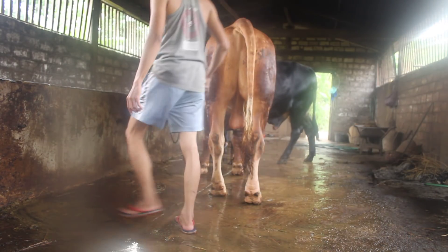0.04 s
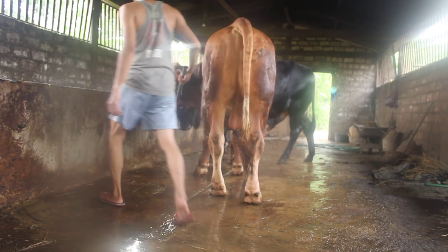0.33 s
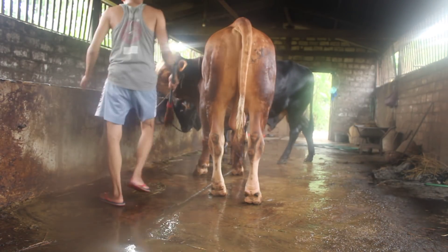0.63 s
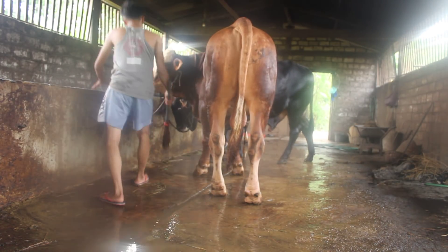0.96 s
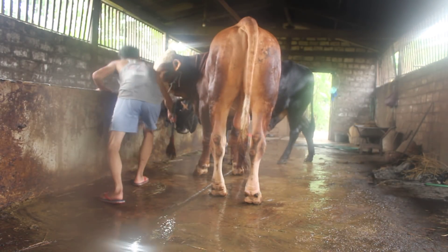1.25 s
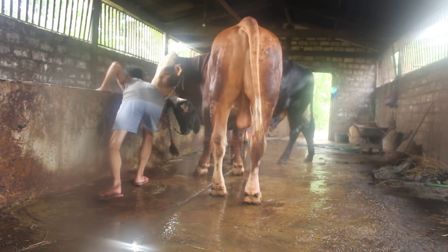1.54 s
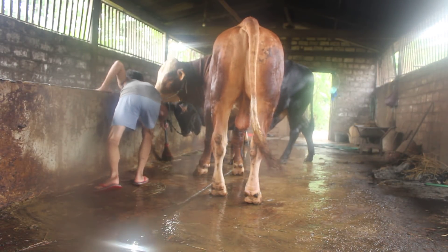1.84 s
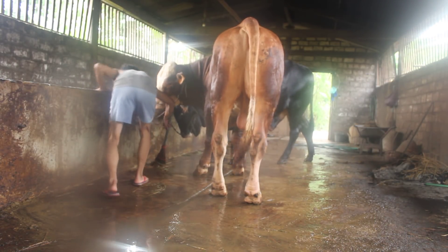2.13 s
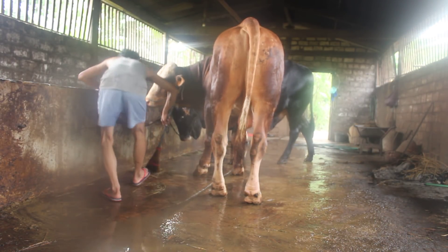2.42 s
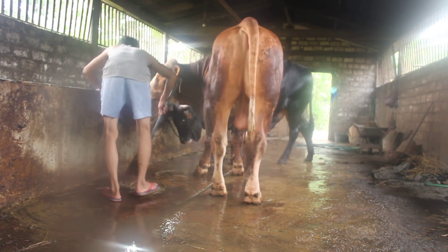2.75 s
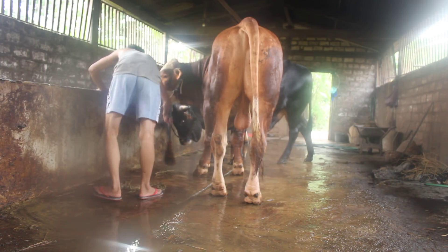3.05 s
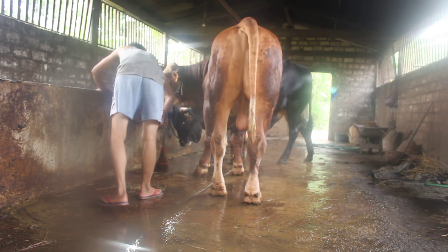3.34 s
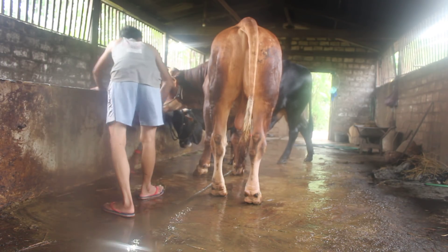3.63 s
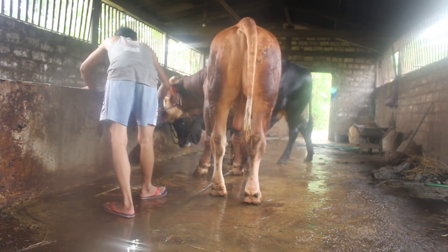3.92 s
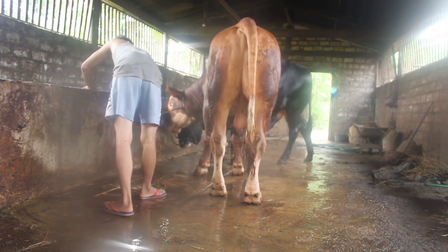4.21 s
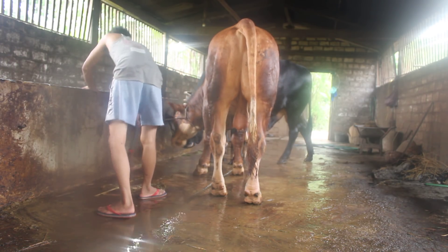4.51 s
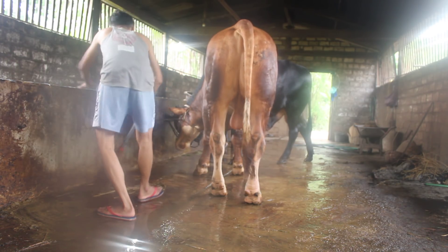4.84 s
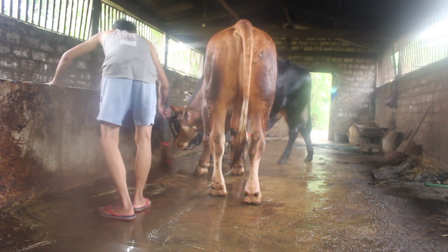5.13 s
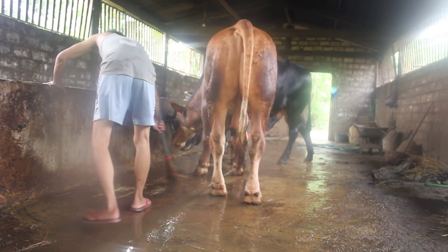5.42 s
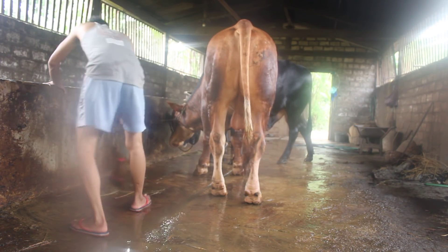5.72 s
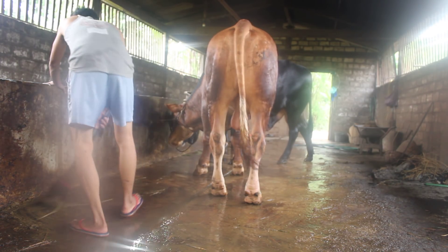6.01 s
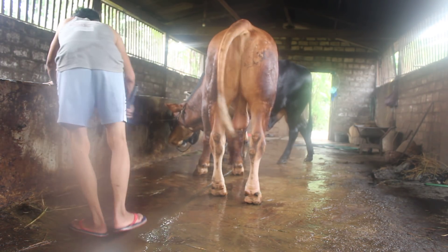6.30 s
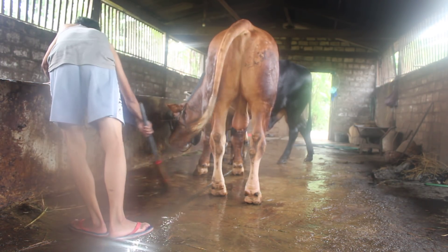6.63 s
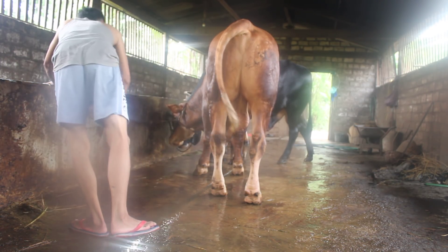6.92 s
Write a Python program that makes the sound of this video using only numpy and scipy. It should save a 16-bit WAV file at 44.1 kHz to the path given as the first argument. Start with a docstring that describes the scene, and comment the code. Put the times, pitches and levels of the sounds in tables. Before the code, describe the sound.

Wet sandal steps and one bird squeak, then five scratchy, splashy broom sweeps over concrete, with distant machines droning.

```python
"""A stiff twig broom pushes water over the concrete floor of a brick cattle shed in five long strokes.
Its twigs catch on the grit, fling spray and shove the water along. Between strokes, wet sandals slap
and squelch, the twigs touch down and drops tick. A bird squeaks once under the roof.
The shed echoes briefly, and behind it all are outdoor air and far machines droning. The sound is mono."""
import sys
import numpy as np
from scipy import signal
from scipy.fft import rfft, irfft, next_fast_len
from scipy.io import wavfile
from scipy.ndimage import map_coordinates

SR = 44100
rng = np.random.default_rng(int(sys.argv[2]) if len(sys.argv) > 2 else 0)


def put_to_file(sound):
    """Save the sound as 16-bit audio at rate SR, in the file named by the first command-line argument."""
    columns = np.atleast_2d(sound).T  # one column per channel
    safe = np.clip(columns, -1, 1)
    whole_steps = np.round(safe * 32767)
    wavfile.write(sys.argv[1], SR, whole_steps.astype(np.int16))


N = 311346
T = np.arange(N) / SR  # the time of each sample in seconds

# The strokes: the twigs touch, bite, are pushed hardest, ease off and lift.
# Each row: start in seconds; attack, push, ease and release lengths in seconds; scrape level in dB at the
# bite, peak and lift; starting spray in dB above the scrape; relative peak level of the water in dB;
# ring pitch in Hz (lower when the bundle is pressed flat).
BROOM_STROKES = [(1.85, 0.45, .25, .135, .08, -27.5, -18.5, -21, -2, -34.5, 2900),
                 (3.2, .17, 0.27, 0.081, 0.079, -24, -18, -26, -0.5, -32, 3017),
                 (4.31, 0.12, .18, .23, 0.085, -23, -19, -26, -2.5, -33.5, 2947),
                 (5.39, 0.15, 0.41, .14, .1, -24.5, -18.5, -25.5, -3, -34, 3340),
                 (6.775, 0.053, .28, 0.097, 0.074, -19.5, -18, -25, -3, -35, 2650)]
# The tone of twigs and spray. Each row: frequency in Hz, relative strength in dB.
TWIG_TONE = [(400, -45), (1000, -15), (1450, -8.5), (1850, -3), (2300, -2), (2800, 0.5), (3800, -0.8),
             (5000, -1.4), (7300, -4), (10500, -9), (13000, -13.5), (15500, -16)]
# The tone of sloshing water. Each row: frequency in Hz, relative strength in dB.
WATER_TONE = [(150, -21), (400, -13), (700, -9), (1100, -6), (1600, -6.5), (2300, -5), (5000, -36)]


def broom(twigs_per_s=10000, drops_per_s=4500, split_hz=7000, water_db=-2, ring_db=-13, ring_width_hz=700):
    """Hundreds of twig tips catch on the grit, ring, fling fine spray and shove a film of water."""
    touch_db = -40.5  # the scrape as the twigs first meet and last leave the floor
    spray_fade_db = -3  # the twigs have flung off their water by the end of a stroke
    scrape, spray, wash, tone_hz = np.zeros((4, N))
    for stroke in BROOM_STROKES:
        times = np.cumsum(stroke[:5])
        bite_db, peak_db, lift_db, spray_db, wash_db, ring_hz = stroke[5:]
        effort = list(zip(times, [touch_db, bite_db, peak_db, lift_db, touch_db]))
        level_db, on_floor = curves(effort)[0], gate(effort)
        progress = np.clip((T - times[0]) / (times[-1] - times[0]), 0, 1)
        scrape += on_floor * amp(level_db)
        spray += on_floor * amp(level_db + spray_db + spray_fade_db * progress ** 2)
        wash += on_floor * amp(wash_db + 0.63 * (level_db - peak_db))  # swells less than the scrape
        tone_hz[on_floor > 0] = ring_hz
    low_share = lambda hz: 1 / (1 + (hz / split_hz) ** 8)  # tips sound below the split, spray above
    tip_tone = lambda hz: amp(along(TWIG_TONE, hz)) * np.sqrt(low_share(hz))
    drop_tone = lambda hz: amp(along(TWIG_TONE, hz)) * np.sqrt(1 - low_share(hz))
    tips = unit(filtered(clicks(twigs_per_s, spread_db=7), tip_tone))
    drops = unit(filtered(clicks(drops_per_s, spread_db=4), drop_tone))
    water = with_tone(clicks(per_s=3000, spread_db=8.5), WATER_TONE)
    # Slow noise moved up to the ring pitch makes the bundle's broad ring.
    flicks = filtered(rng.standard_normal((2, N)), lambda hz: np.exp(-(hz / ring_width_hz) ** 2))
    ring = unit(flicks[0] * np.cos(phase(tone_hz)) + flicks[1] * np.sin(phase(tone_hz)))
    judder = amp(0.5 * wobble(55) + wobble(14))  # the bundle grips and slips, the hand presses unevenly
    return judder * (scrape * (tips + amp(ring_db) * ring) + spray * drops + amp(water_db) * wash * water)


# The broom drives into puddles. Each row: middle in seconds, half length in seconds, level in dB.
PUDDLES = [(2.294, 0.074, -37), (2.658, .04, -28), (3.32, 0.055, -40), (3.66, .06, -40),
           (4.84, 0.051, -33.5), (5.726, 0.17, -31)]


def sloshes(bubbles_per_s=3000):
    """Water swells briefly ahead of the twigs."""
    swell = sum(amp(db) * np.exp(-((T - middle) / half) ** 2) for middle, half, db in PUDDLES)
    return swell * with_tone(clicks(bubbles_per_s, spread_db=5), WATER_TONE)


# Sandals and twigs land on the wet floor. Each row: start in seconds, level in dB,
# seconds to fade by 60 dB, tilt in dB per octave (higher is brighter).
WET_CONTACTS = [(0.248, -33, 0.14, -2.5), (.265, -32, .13, 3.5), (0.791, -45.5, 0.43, -5),
                (.982, -34, .045, 5.5), (.988, -25.5, 0.037, 3), (.994, -29, 0.24, -6),
                (1.094, -32, 0.079, 2), (1.517, -47, 0.36, -1), (1.553, -34.5, 0.19, -2),
                (1.732, -35, 0.34, 1), (2.9, -43, 0.2, 2), (2.943, -30, 0.2, -4.5), (2.96, -28, 0.18, 1.5),
                (3.87, -48.5, 1, 1), (3.991, -26, 0.061, -2), (4.195, -44.5, 0.21, 3), (4.25, -38, .6, 1),
                (5.015, -34.5, 0.38, -2.5), (5.055, -31.5, .2, 0), (5.21, -39, .27, -3),
                (5.261, -33, 0.058, -2), (6.688, -29, 0.83, 2)]
# The tone of a splat before its tilt. Each row: frequency in Hz, relative strength in dB.
SPLAT_TONE = [(150, -30), (400, -35), (1000, -14.5), (2200, -1), (3500, -2.5), (6000, -6), (10000, -10.5),
              (15500, -23.5)]


def splats(bubbles_per_s=8000):
    """Each contact squeezes out a short crackle of water."""
    out, t = np.zeros(N + SR), np.arange(SR // 2) / SR
    for start, db, fade_s, tilt_db in WET_CONTACTS:
        tone = lambda hz: amp(along(SPLAT_TONE, hz) + tilt_db * np.log2(np.maximum(hz, 500) / 4000))
        crackle = unit(filtered(clicks(bubbles_per_s, spread_db=6, size=len(t)), tone))
        rise_s = 0.026 * fade_s  # a longer squelch also swells more slowly
        shape = np.minimum(t / rise_s, 1) * amp(-60 * np.maximum(t - rise_s, 0) / fade_s)
        out[round(start * SR):][:len(t)] += amp(db) * shape * crackle
    return out[:N]


# Heels, twigs and drops tap the floor.
# Each row: start in seconds, level in dB, pitch in Hz, seconds to fade by 60 dB.
FLOOR_TAPS = [(.268, -22, 3320, 0.013), (.989, -27, 2300, .03), (.995, -23.5, 460, 0.046),
              (1.08, -28, 90, 0.11), (1.263, -35, 109, 0.13), (3.9925, -17, 2110, 0.011),
              (5.058, -21, 11800, 0.0033), (5.125, -22, 9900, .002)]


def taps(rows, rise_s=0.00035):
    """Each tap rings at one pitch and dies away quickly."""
    out, t = np.zeros(N + SR), np.arange(SR // 3) / SR
    for start, db, hz, fade_s in rows:
        shape = amp(db - 60 * t / fade_s) * (1 - np.exp(-t / rise_s))
        out[round(start * SR):][:len(t)] += shape * np.sin(2 * np.pi * hz * t)
    return out[:N]


def drips(per_s=6.4, db=-41, spread_db=5, hz=10460, pitch_spread=0.22, fade_s=0.002):
    """Tiny stray drops land on the wet floor at random moments."""
    draws = rng.random((round(per_s * N / SR), 3))
    return taps([(when * T[-1], db + spread_db * (2 * loud - 1),
                  hz * np.exp(pitch_spread * (2 * high - 1)), fade_s) for when, loud, high in draws])


# The bird's rising whistle. Each row: time in seconds, pitch in Hz, relative level in dB.
BIRD_WHISTLE = [(.335, 4440, -43), (.42, 5400, -40), (.466, 6170, -34), (.49, 6850, -26.5),
                (.508, 7520, -30.5), (.525, 7600, -44.5)]
# Its lower, hoarse voice. Each row: time in seconds, pitch in Hz, relative level in dB.
BIRD_SQUAWK = [(.37, 1207, -55), (.39, 1270, -25), (.408, 1290, -29), (.424, 1636, -32), (.443, 1620, -26)]
# The tone its throat gives the rasp. Each row: frequency in Hz, relative strength in dB.
THROAT_TONE = [(1000, -43), (1600, 7), (2200, -5.5), (3200, -2.5), (4200, -4.5), (5500, -15), (8000, -24),
               (15000, -44)]


def bird(waver=0.011, roughness=0.047, overtone_db=-14, rasp_at_s=0.415):
    """One side of the bird's voice box whistles while the other squawks, with a harsh burst of breath."""
    hz, db = curves(BIRD_WHISTLE)
    whistle = gate(BIRD_WHISTLE) * amp(db) * np.sin(phase(hz * (1 + waver * wobble(400))))
    hz, db = curves(BIRD_SQUAWK)
    angle = phase(hz * (1 + roughness * wobble(350)))
    voice = np.sin(angle) + amp(overtone_db) * np.sin(2 * angle)
    squawk = gate(BIRD_SQUAWK) * amp(db + 1.9 * wobble(199)) * voice
    rasp = with_tone(rng.standard_normal(N), THROAT_TONE)
    rasp_db = -23 - np.maximum(344 * (rasp_at_s - T), 750 * (T - rasp_at_s))  # rise, fall in dB a second
    return whistle + squawk + amp(rasp_db) * rasp


# How long the shed rings. Each row: frequency in Hz, seconds to fade by 60 dB.
ECHO_TIMES = [(200, 0.15), (1500, 0.68), (4000, 0.5), (8000, 0.42), (15000, 0.24)]


def shed_echo(sound, delay_s=0.006):
    """Brick walls and roof store the sound and give it back as a soft tail; middle pitches last longest."""
    frames = dict(fs=SR, nperseg=256, noverlap=192)
    hz, t, bands = signal.stft(sound, **frames)
    kept = amp(-120 * t[1] / along(ECHO_TIMES, hz))  # share of the energy left after one step
    stored = np.array([signal.lfilter([1 - k], [1, -k], np.abs(band) ** 2) for k, band in zip(kept, bands)])
    noise = signal.stft(rng.standard_normal(N), **frames)[2]
    tail = signal.istft(noise * np.sqrt(stored / np.mean(np.abs(noise) ** 2)), **frames)[1]
    return np.interp(T - delay_s, T, tail[:N], left=0)


# The rumble of far engines. Each row: time in seconds, level in dB.
ENGINE_LEVELS = [(0, -48), (.5, -69), (1.4, -59.5), (2.4, -45), (4.1, -49), (5.6, -45.5), (6.4, -45),
                 (6.75, -36), (7.06, -38)]
# The tone of that rumble. Each row: frequency in Hz, relative strength in dB.
ENGINE_TONE = [(25, -20), (55, 4), (85, -9), (135, 7.5), (170, -30), (215, 1), (300, -19), (1000, -50)]
# Broad, steady drones. Each row: centre in Hz, width in Hz, level in dB.
BROAD_DRONES = [(34, 11, -45.5), (81.5, 55, -43), (362, 58, -46.5), (1710, 860, -50.5), (9340, 260, -71.5)]
# Faint, wavering hums. Each row: pitch in Hz, level in dB.
THIN_HUMS = [(59, -48), (335, -53), (623, -55), (1024, -53.5)]
# Drones that come and go. Each row: start in seconds, end in seconds, pitch in Hz, peak level in dB.
PASSING_DRONES = [(-.5, 0.65, 409.4, -40.5), (-.5, 1.6, 337, -44), (1.45, 2.3, 138.4, -42.5),
                  (1.6, 2.21, 1025, -44.5), (3.7, 4.3, 994, -45)]


def far_machines(hum_width_hz=9):
    """Distant machines rumble, drone and hum."""
    out = amp(curves(ENGINE_LEVELS)[0]) * with_tone(rng.standard_normal(N), ENGINE_TONE)
    for hz, width_hz, db in BROAD_DRONES:
        out += amp(db) * noise_band(hz, width_hz)
    for hz, db in THIN_HUMS:
        out += amp(db) * noise_band(hz, hum_width_hz)
    for start, end, hz, db in PASSING_DRONES:
        swell = np.sin(np.pi * np.clip((T - start) / (end - start), 0, 1))
        out += amp(db) * swell * noise_band(hz, width_hz=0.047 * hz)
    return out


# The tone of the outdoor rush. Each row: frequency in Hz, relative strength in dB.
AIR_TONE = [(13, -41), (22, -9), (80, -3.5), (282, -5.5), (315, -3), (352, -7), (403, -6), (450, -7.5),
            (643, -10.5), (737, -10.5), (1590, -12), (1980, -19.5), (2830, -21), (3330, -26), (15500, -49)]


def outdoor_air(db=-34.5):
    """A soft, steady rush comes in from outside."""
    return amp(db) * with_tone(rng.standard_normal(N), AIR_TONE)


def amp(db):
    """Turn decibels into a number to multiply by."""
    return 10 ** (np.asarray(db) / 20)


def unit(x):
    """Scale a sound to an average power of one."""
    return x / np.sqrt(np.mean(x ** 2) + 1e-20)


def along(points, hz):
    """Read between a table's (Hz, value) rows, with octaves about evenly spaced."""
    freqs, values = np.transpose(points)
    return np.interp(np.log(hz + 1), np.log(freqs + 1), values)


def curves(rows):
    """One value per sample for each column after the time."""
    times, *columns = np.transpose(rows)
    return [np.interp(T, times, column) for column in columns]


def gate(rows, rise_s=0.011, fall_s=0.016):
    """On from a table's first time to its last, with soft edges."""
    return np.clip((T - rows[0][0]) / rise_s + .5, 0, 1) * np.clip((rows[-1][0] - T) / fall_s + 1, 0, 1)


def wobble(per_s):
    """A smooth curve through per_s random values a second."""
    return map_coordinates(rng.standard_normal(int(N * per_s / SR) + 4), [T * per_s])


def filtered(x, response):
    """Scale each frequency in a sound by response(hz)."""
    n = x.shape[-1]
    padded = next_fast_len(n + 8192)
    return irfft(rfft(x, padded) * response(np.fft.rfftfreq(padded, 1 / SR)), padded)[..., :n]


def with_tone(x, tone):
    """Give a sound the tone in a table, at a power of one."""
    return unit(filtered(x, lambda hz: amp(along(tone, hz))))


def noise_band(centre_hz, width_hz):
    """Noise gathered around one pitch."""
    return unit(filtered(rng.standard_normal(N), lambda hz: 1 / (1 + (2 * (hz - centre_hz) / width_hz) ** 2)))


def clicks(per_s, spread_db, size=N):
    """Tiny random hits of uneven strength."""
    hit = rng.random(size) < per_s / SR
    return unit(hit * rng.choice([-1, 1], size) * amp(spread_db * rng.uniform(-1, 1, size)))


def phase(hz):
    """The running angle of a wave whose pitch changes."""
    return 2 * np.pi * np.cumsum(hz) / SR


def scene():
    """Broom, feet and bird share the shed's echo; both channels carry the same sound."""
    sweep, call = broom() + sloshes(), bird()
    steps = splats() + taps(FLOOR_TAPS)
    echo = shed_echo(amp(-3.5) * sweep + steps + amp(-2) * call)
    mix = sweep + steps + drips() + amp(2) * call + echo + far_machines() + outdoor_air()
    return np.array([mix, mix])


def record(dry, top_hz=15750):
    """Cut the deepest rumble and the very highest treble."""
    return filtered(dry, lambda hz: np.clip((top_hz - hz) / 200 + .5, 0, 1) * np.clip((hz - 14) / 8, 0, 1))


dry = scene()
out = record(dry)
put_to_file(out)
```